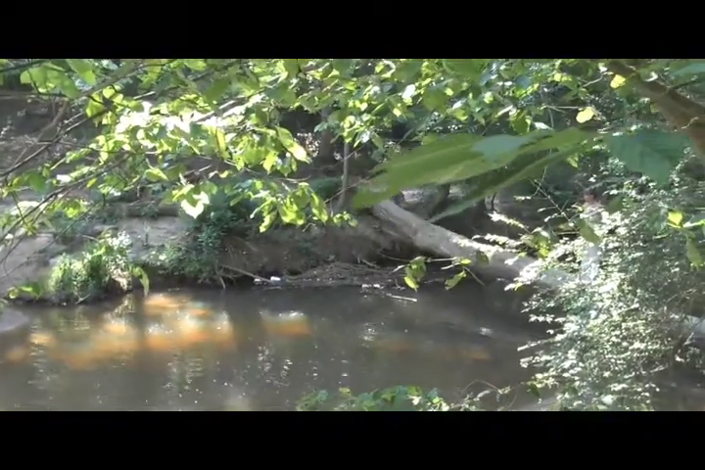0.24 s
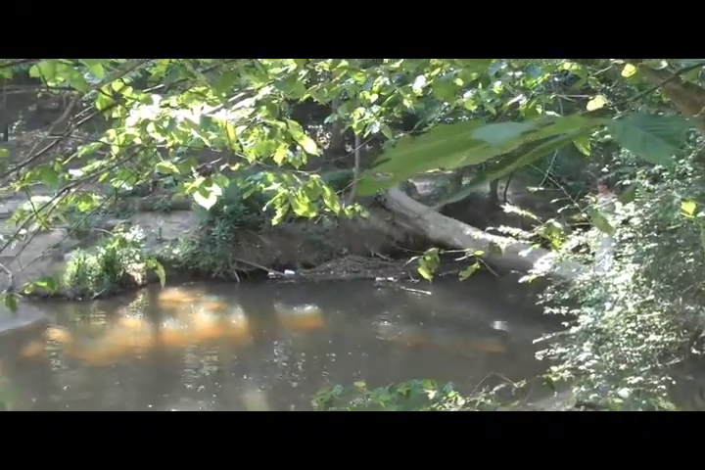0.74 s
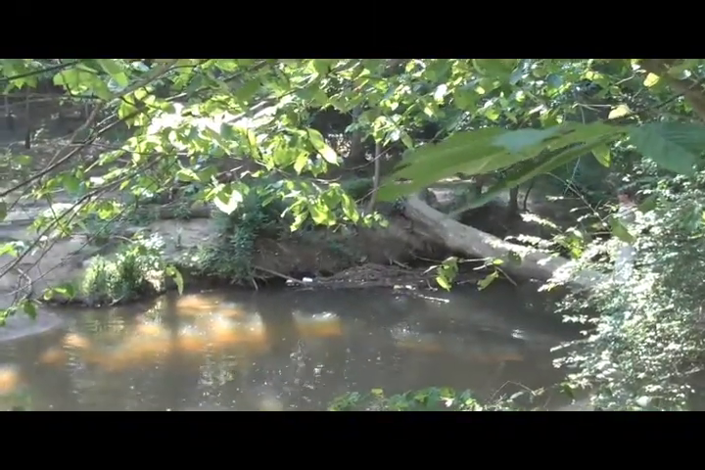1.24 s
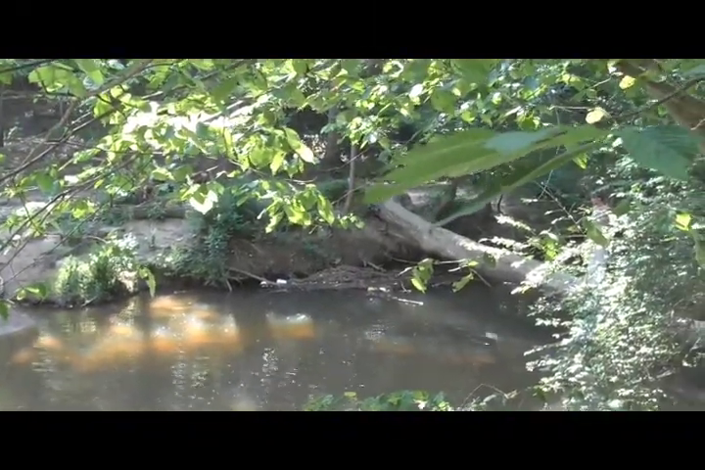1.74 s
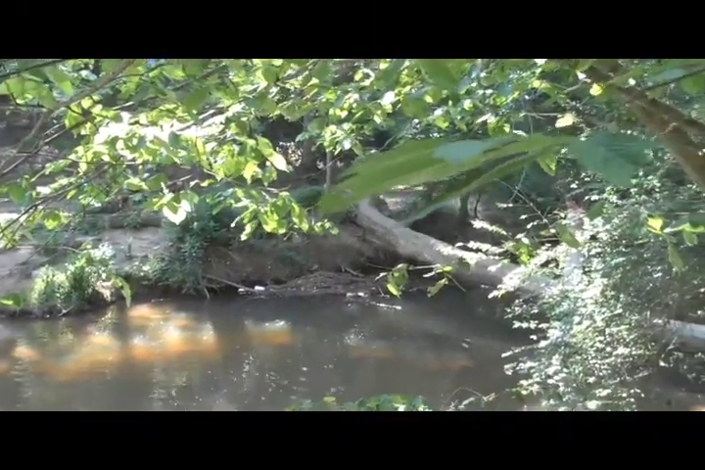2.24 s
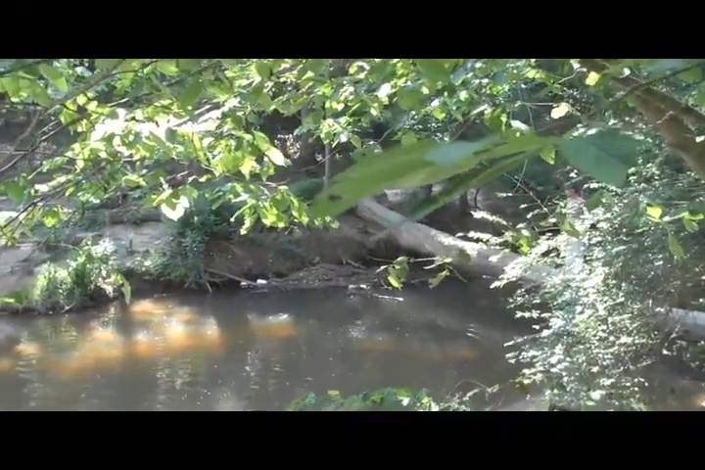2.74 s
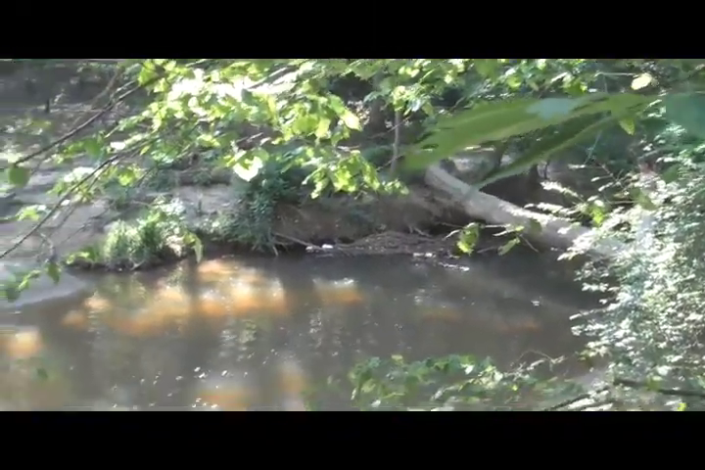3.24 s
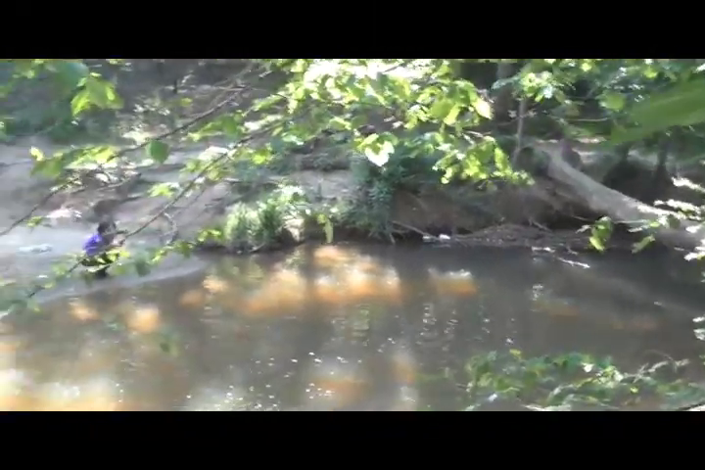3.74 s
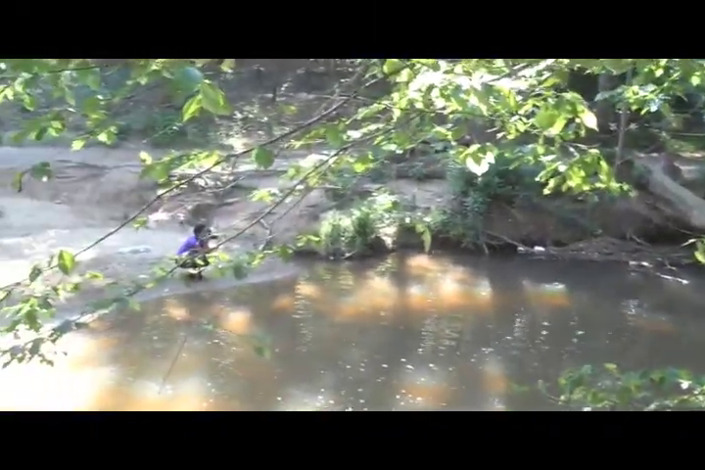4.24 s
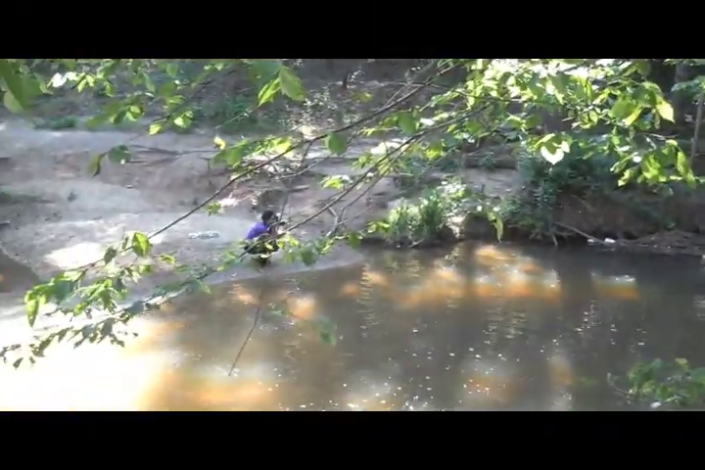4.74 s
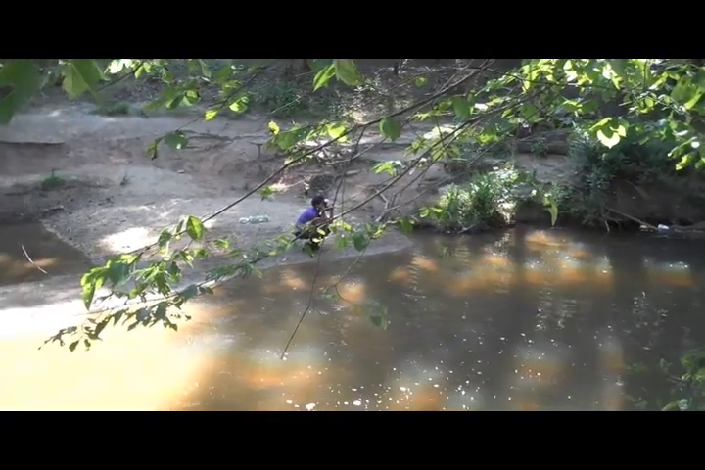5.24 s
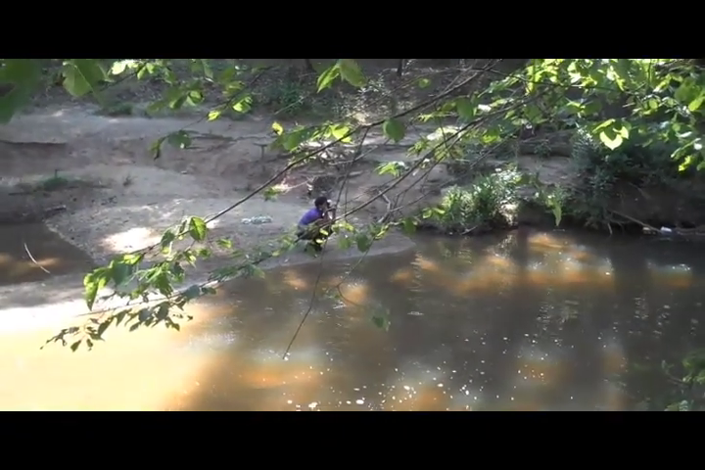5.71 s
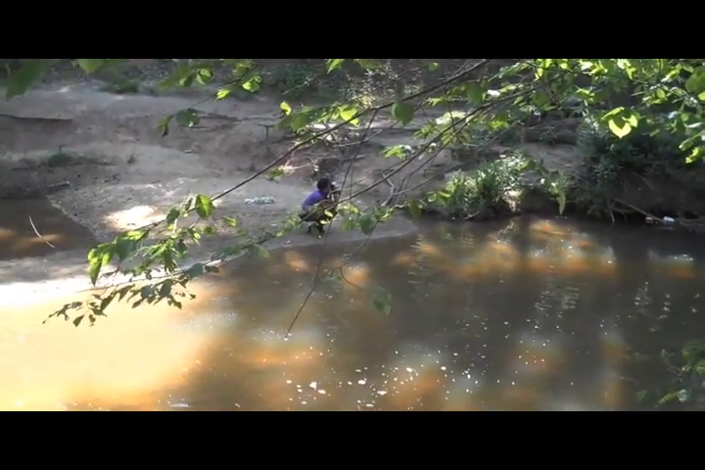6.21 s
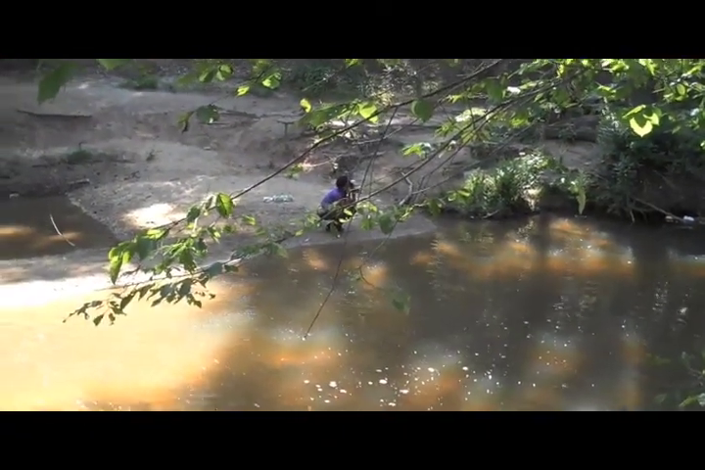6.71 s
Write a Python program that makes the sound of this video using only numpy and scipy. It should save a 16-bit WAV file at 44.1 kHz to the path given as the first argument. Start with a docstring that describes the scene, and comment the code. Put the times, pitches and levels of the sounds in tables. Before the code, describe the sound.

A creek rushes steadily over a small weir, an even bubbling hiss with slight surges and a few faint glugs.

```python
"""An even, slightly surging hiss: a creek rushing over a small weir, in mono from the wooded bank.
Thousands of small bubbles ring in the churning foam and merge; nearer ones ring singly and add grain.
Now and then a larger air pocket glugs. The rush slowly grows louder."""
import sys
import numpy as np
from scipy import signal
from scipy.fft import rfft, irfft
from scipy.io import wavfile
from scipy.ndimage import uniform_filter1d

SR = 44100
rng = np.random.default_rng(int(sys.argv[2]) if len(sys.argv) > 2 else 0)


def to_wav(sig):
    """Store sig (one row per channel, or 1-D mono) as 16-bit WAV at the path in sys.argv[1].

    Samples outside -1..1 are clipped; the rate is SR.
    """
    pcm = np.clip(np.atleast_2d(sig), -1, 1) * 32767
    pcm = np.round(pcm).astype(np.int16)
    wavfile.write(sys.argv[1], SR, pcm.T)  # frames by channels


N = 307377
TOP_HZ = 13950


def undb(db):
    """Decibels to gain."""
    return 10 ** (np.asarray(db) / 20)


def level(x, rms_db):
    """Scale to an rms level."""
    return x * undb(rms_db) / np.sqrt(np.mean(x ** 2))


def colour(x, points):
    """Filter by (freq_hz, gain_db) points joined on a log-frequency axis."""
    freq_hz, gain_db = np.transpose(points)
    bins_hz = np.maximum(np.arange(N // 2 + 1) * SR / N, 1)
    curve_db = np.interp(np.log(bins_hz), np.log(freq_hz), gain_db)
    return irfft(rfft(x) * undb(curve_db), N)


def wander(rate_hz):
    """Random values joined by ramps; rms 1."""
    hold = max(int(SR / rate_hz), 1)
    steps = np.repeat(rng.standard_normal(N // hold + 2), hold)
    return level(uniform_filter1d(steps, hold)[:N], 0)


def ring(age_s, pitch_hz, t60_s, rise):
    """Damped bubble note; nearing the surface, its pitch climbs by the fraction rise per t60_s."""
    phase = 2 * np.pi * pitch_hz * age_s * (1 + rise * age_s / t60_s / 2)
    return np.sin(phase) * undb(-60 * age_s / t60_s)


def bubble_cloud(count=32000, low_hz=330, high_hz=13000, cycles=28, rise=0.14, scatter_db=1.0):
    """Dense bubbles: small ones ring high and short, large ones low and longer."""
    out = np.zeros(N + SR)
    for when, smallness, strength in rng.random((count, 3)):
        pitch_hz = low_hz + smallness * (high_hz - low_hz)
        t60_s = cycles / pitch_hz
        strength_db = -scatter_db * np.log(1 - strength * 0.998)  # most faint, a few stand out
        gain = undb(strength_db) * np.sqrt(pitch_hz)  # equal energy at every size
        age_s = np.arange(int(t60_s * SR)) / SR
        start = int(when * N)
        out[start:start + len(age_s)] += gain * ring(age_s, pitch_hz, t60_s, rise)
    return out[:N]


def near_bubbles(count=900, low_hz=450, high_hz=5500, cycles=55, rise=0.085, spread_db=4.0):
    """Sparse, longer-ringing bubbles give the rush its grain."""
    out = np.zeros(N + SR)
    for when, smallness, strength in rng.random((count, 3)):
        pitch_hz = low_hz * (high_hz / low_hz) ** smallness
        t60_s = cycles / pitch_hz
        gain = undb(spread_db * strength) * np.sqrt(pitch_hz)
        age_s = np.arange(int(t60_s * SR)) / SR
        start = int(when * N)
        out[start:start + len(age_s)] += gain * ring(age_s, pitch_hz, t60_s, rise)
    return out[:N]


def foam(bands=12, flicker_db=0.37, flicker_hz=11):
    """Bursts too fine to tell apart; each size range swells and ebbs on its own."""
    upper_edges_hz = np.geomspace(200, TOP_HZ, bands)
    band_of_bin = np.searchsorted(upper_edges_hz, np.arange(N // 2 + 1) * SR / N)
    spectrum = rfft(rng.standard_normal(N))
    return sum(irfft(spectrum * (band_of_bin == k), N) * undb(flicker_db * wander(flicker_hz))
               for k in range(bands))


def white_water():
    """Bubbles and foam merge into one broad rush with almost no bass."""
    # spectrum at the bank: freq_hz, gain_db
    bank_spectrum = [(25, -22.5), (85, -36.5), (130, -28), (200, -17), (330, -7.5), (520, -9.5), (720, -3),
                     (1300, -1.03), (2700, -0.5), (4200, -2.5), (6500, -5.5), (10000, -8), (12300, -7.5),
                     (13800, -8)]
    churn = level(bubble_cloud(), -7.5) + level(near_bubbles(), -16) + level(foam(), -2.1)
    return colour(churn, bank_spectrum)


def glugs(swell_s=0.014, rise=0.047):
    """Large air pockets pinch off below the weir and ring briefly."""
    # air pockets: start_s, pitch_hz, peak_db, t60_s
    pockets = [(1.05, 1556, -38, 0.1), (1.945, 1045, -40.5, .12), (4.015, 724, -40, .16),
               (4.595, 1358, -41.5, .14)]
    out = np.zeros(N + SR)
    age_s = np.arange(SR // 2) / SR
    onset = 1 - np.exp(-(age_s / swell_s) ** 2)
    for start_s, pitch_hz, peak_db, t60_s in pockets:
        note = ring(age_s, pitch_hz, t60_s, rise) * onset
        start = int(start_s * SR)
        out[start:start + len(age_s)] += undb(peak_db) * note / np.abs(note).max()
    return out[:N]


def surge_splash(rush, time_s, attack_s=0.11, release_s=0.14):
    """Extra splash as water surges over the weir: builds, holds, ebbs."""
    # surges, before the splash weighting: start_s, length_s, lift_db
    surges = [(1.68, 0.46, 0.46), (3.18, .3, .5), (3.68, .57, 0.8), (4.92, .33, 0.6), (6.05, .5, .5)]
    # splash weighting, strongest in the middle: freq_hz, gain_db
    splash_spectrum = [(500, -29), (1500, 2), (5000, 2.5), (10000, -2)]
    surge_db = np.zeros(N)
    for start_s, length_s, lift_db in surges:
        build = (time_s - start_s) / attack_s
        ebb = (start_s + length_s - time_s) / release_s
        surge_db += lift_db * np.clip(np.minimum(build, ebb), 0, 1)
    return (undb(surge_db) - 1) * colour(rush, splash_spectrum)


def scene(rush_rms_db=-34, growth_db_per_s=0.12):
    """Surging, slowly growing rush plus glugs; both channels alike."""
    time_s = np.arange(N) / SR
    rush = white_water()
    surging = rush + surge_splash(rush, time_s)
    growing = surging * undb(growth_db_per_s * time_s)
    creek = level(growing, rush_rms_db) + glugs()
    return np.array([creek, creek])


def record(dry):
    """Steep low-pass cuts the top of the treble."""
    lowpass = signal.ellip(12, rp=0.1, rs=70, Wn=TOP_HZ, fs=SR, output="sos")
    return signal.sosfilt(lowpass, dry)


dry = scene()
out = record(dry)
to_wav(out)
```